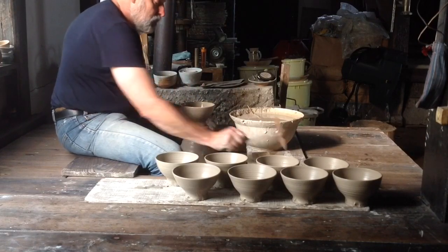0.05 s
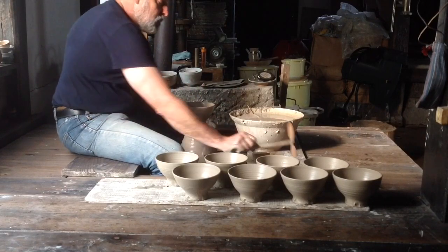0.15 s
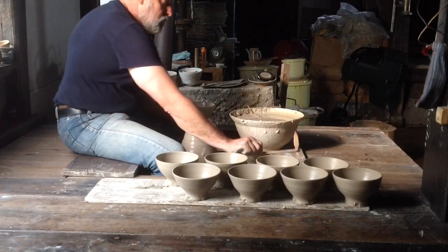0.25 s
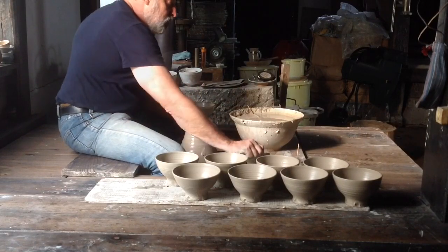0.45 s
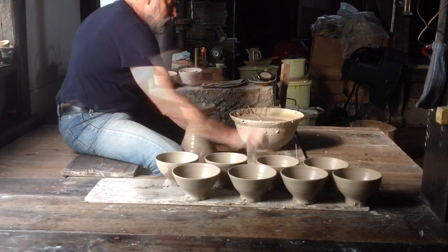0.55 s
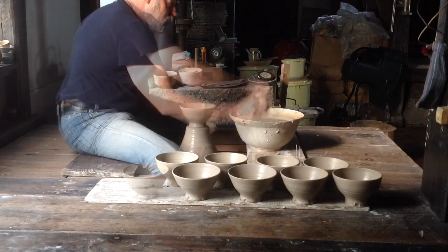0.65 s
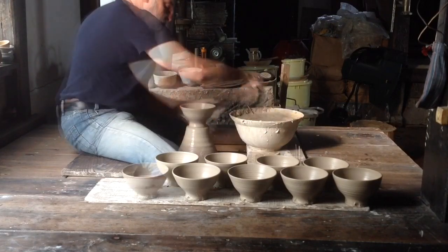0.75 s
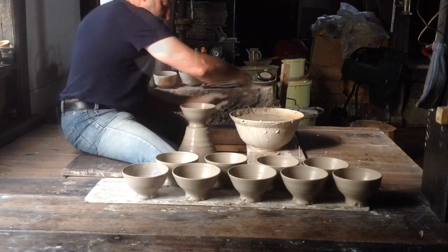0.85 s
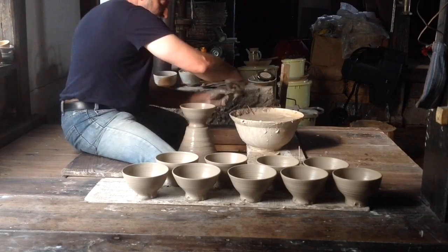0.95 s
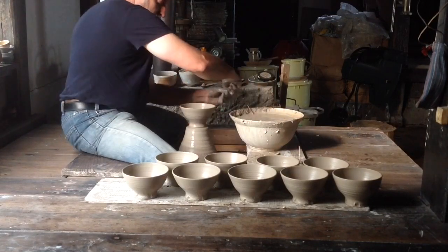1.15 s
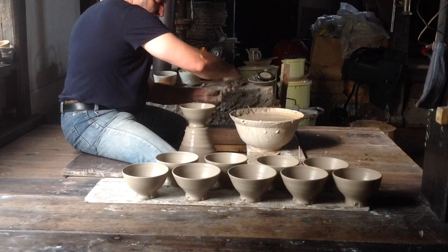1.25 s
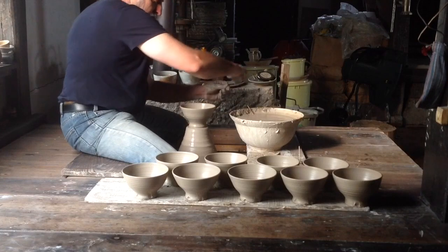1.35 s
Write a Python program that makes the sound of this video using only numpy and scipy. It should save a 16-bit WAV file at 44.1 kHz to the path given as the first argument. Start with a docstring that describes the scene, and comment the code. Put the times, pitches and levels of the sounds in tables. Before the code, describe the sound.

Dull knocks and a short clatter of a tool on floorboards, then soft potter's wheel bumps.

```python
"""Over faint hiss, a potter knocks a small hard tool down on a wooden floor: one dull knock that rocks
a little, a second, then a short clatter as it settles. Each impact excites the damped modes of boards
and tool, so the boards boom, the tool clicks and the workshop reverberates briefly. Then the potter's
wheel rumbles and bumps softly as it turns, with light friction noise from scrapes and a sleeve."""
import sys
import numpy as np
from scipy import signal
from scipy.fft import rfft, irfft
from scipy.io import wavfile
from scipy.ndimage import uniform_filter1d, minimum_filter1d

SR = 44100
rng = np.random.default_rng(int(sys.argv[2]) if len(sys.argv) > 2 else 0)


def waveform_to_disk(signal):
    """Save audio, clipped to [-1, 1], as 16-bit WAV at the path in sys.argv[1]."""
    frames = np.transpose(np.atleast_2d(signal))
    scaled = np.clip(frames, -1, 1) * 32767
    samples = np.round(scaled).astype(np.int16)
    wavfile.write(sys.argv[1], SR, samples)


N = 61739


def undb(db):
    """Amplitude ratio of a level in decibels."""
    return 10 ** (np.asarray(db) / 20)

def unit(x):
    """Normalisation to unit energy."""
    return x / np.sqrt(np.sum(x ** 2))

def along(points, hz):
    """Interpolation of (f/Hz, value) points on a log-frequency axis."""
    f, v = np.array(points, float).T
    return np.interp(np.log(hz + 1), np.log(f), v)

def freqs():
    """Bin frequencies of a 2N-point transform."""
    return np.arange(N + 1) * SR / (2 * N)

def shape(x, gain):
    """Filtering as multiplication of the spectrum."""
    return irfft(rfft(x, 2 * N) * gain)[:N]

def noise(spectrum):
    """Spectrally shaped Gaussian noise of unit rms."""
    return unit(shape(rng.standard_normal(2 * N), undb(along(spectrum, freqs())))) * np.sqrt(N)

def drift(rate_hz):
    """Slow random modulation: random steps, smoothed twice."""
    k = int(SR / rate_hz)
    steps = np.repeat(rng.standard_normal(N // k + 1), k)
    return 0.99 * uniform_filter1d(uniform_filter1d(steps, k), k)[:N]

def fade(t60):
    """Exponential decay, 60 dB in t60 seconds."""
    return np.exp(-np.log(1000) * np.arange(N) / SR / t60)

def delay(x, s):
    """A time shift of s seconds."""
    return np.concatenate([np.zeros(int(s * SR)), x])[:N]

def cut(x, side, hz, order):
    """Maximally flat low-pass or high-pass filter."""
    return signal.sosfilt(signal.butter(order, hz, side, fs=SR, output="sos"), x)

def causal(gain):
    """Minimum-phase response: it rings only after its cause."""
    cepstrum = irfft(np.log(gain + 1e-9))
    cepstrum[1:N] *= 2
    cepstrum[N + 1:] = 0
    return np.exp(rfft(cepstrum))

def ring(t, modes, rise_s):
    """Modal superposition: damped sinusoids with a smooth onset."""
    onset = 1 - np.exp(-(t / rise_s) ** 2)
    return sum(undb(db) * np.sin(2 * np.pi * hz * t) * fade(t60) for hz, db, t60 in modes) * onset

def burst(t, rise_s, t60):
    """Impact excitation: a short noise transient of unit energy."""
    return unit(rng.standard_normal(N) * fade(t60) * (1 - np.exp(-t / rise_s)))


# spectrum of the hiss (f/Hz, relative level/dB)
HISS_SPECTRUM = [(30, -6), (70, -34), (150, 4), (300, -1), (600, -0.5), (1100, -5), (2200, -6), (3500, -6),
                 (6000, -8), (15000, -8.5)]

def hiss(level_db=-63):
    """Stationary broadband noise forms the background."""
    return undb(level_db) * noise(HISS_SPECTRUM)

# brushes of a sleeve (t/s, width/s, f/Hz, level/dB)
SLEEVE_BRUSHES = [(.085, 0.045, 3740, -67), (1.0, 0.021, 4000, -69.5), (1.109, 0.014, 2700, -63)]

def sleeve(t):
    """Friction of cloth as the arm moves gives brief swells of band noise."""
    out = 0
    for s, width, hz, db in SLEEVE_BRUSHES:
        swell = np.exp(-((t - s) / width) ** 2 / 2)
        out = out + undb(db) * swell * noise([(hz / 2, -22), (hz, 0), (hz * 2, -22)])
    return out

# scrapes at the wheel (t/s, rise/s, T60/s, level/dB)
SCRAPE_STROKES = [(.72, 0.023, 0.71, -59.5), (0.824, 0.016, 0.64, -65), (1.15, 0.034, 0.4, -64.5),
                  (1.236, 0.022, 0.43, -51), (1.271, 0.02, 0.25, -58.5)]
# their spectrum (f/Hz, relative level/dB)
SCRAPE_SPECTRUM = [(150, -16), (450, 3.5), (900, 3), (1200, -7), (1600, 0), (2300, -11), (3500, -20.5),
                   (7000, -27), (14000, -26)]

def scrapes(t, rough_db=1.0):
    """Sliding friction gives grainy noise that decays exponentially in the room."""
    envelope = 0
    for s, rise, t60, db in SCRAPE_STROKES:
        attack = np.clip((t - s) / rise, 0, 1)
        decay = np.exp(-np.log(1000) * np.maximum(t - s - rise, 0) / t60)
        envelope = envelope + undb(db) * attack * decay
    return envelope * noise(SCRAPE_SPECTRUM) * undb(rough_db * drift(200))

# envelope of the wheel's rumble (t/s, level/dB)
RUMBLE_ENVELOPE = [(0, -86), (.55, -63), (.69, -67), (.73, -52), (.79, -58.5), (.85, -52.5), (.9, -58),
                   (1.1, -52.5), (1.16, -55.5), (1.24, -51.5), (1.4, -58)]
# its spectrum (f/Hz, relative level/dB)
RUMBLE_SPECTRUM = [(40, -28), (75, -18.5), (110, -2), (200, 2.5), (320, 0), (480, -7), (700, -14.5),
                   (1000, -19.5), (2000, -24), (5000, -39), (14000, -37)]
# resonances rubbed up by the wheel (t/s, duration/s, f/Hz, level/dB)
WHEEL_RESONANCES = [(0.695, .24, 389.5, -57), (0.908, .22, 178, -55.5), (1.034, .19, 218, -57.5),
                    (1.301, .16, 172.6, -57), (1.34, .12, 235, -58)]

def wheel(t, edge_s=0.02, wander=0.012, flutter_db=-0.5):
    """Structure-borne rumble crosses the floor while friction excites wavering resonances."""
    out = noise(RUMBLE_SPECTRUM) * undb(np.interp(t, *np.array(RUMBLE_ENVELOPE).T))
    for s, length, hz, db in WHEEL_RESONANCES:
        swell = np.clip(np.minimum(t - s, s + length - t) / edge_s, 0, 1)
        phase = 2 * np.pi * np.cumsum(hz * (1 + wander * drift(40.16))) / SR
        out = out + swell * undb(db + flutter_db * drift(46)) * np.sqrt(2) * np.sin(phase)
    return out

# bumps of the turning wheel (t/s, level/dB)
WHEEL_BUMPS = [(.716, -57.5), (0.831, -57), (0.934, -45), (1.004, -48), (1.082, -45), (1.203, -51),
               (1.318, -44), (1.374, -49.5)]
# low modes of the boards (f/Hz, relative level/dB, T60/s)
BOARD_LOW_MODES = [(169.4, -4, 0.24), (216.6, 4.5, 0.1), (313, 1.5, 0.042)]

def bumps(t):
    """Each soft bump sets the boards' low modes into damped free vibration."""
    boom = ring(t, BOARD_LOW_MODES, rise_s=0.0044)
    return sum(delay(undb(db) * boom, s) for s, db in WHEEL_BUMPS)

# reverberation time of the workshop (f/Hz, T60/s)
REVERB_TIMES = [(150, 0.32), (700, 0.52), (2000, 0.41), (7000, 0.32), (14000, 0.27)]

def workshop(t, build_s=0.007):
    """Impulse response of a diffuse field: it builds quickly, and the top treble dies first."""
    white, tail = rng.standard_normal(N), 0
    for band_hz, t60 in REVERB_TIMES:
        band = along([(hz, hz == band_hz) for hz, _ in REVERB_TIMES], freqs())
        tail = tail + shape(white, band) * fade(t60)
    return unit(tail * (1 - np.exp(-t / build_s)))

def reverberate(x, room, wet_db):
    """Direct sound plus its convolution with the room response."""
    return x + undb(wet_db) * signal.fftconvolve(x, room)[:N]

# modes of the boards (f/Hz, relative level/dB, T60/s)
FLOOR_MODES = [(150.5, -24, 0.46), (171.9, -11, .33), (225.25, -17, 0.95), (293, -41, 0.17),
               (338, -11, 0.29), (359, -24, 0.58), (479, -8, 0.23), (637, -7, .12), (697.3, -5.5, .33),
               (835.5, -9, 0.2), (919, -24, 0.23), (1073, -10.5, 0.29), (1315, -6, 0.14),
               (1838, -2.5, 0.14)]
# spectrum of the wood's dense thud (f/Hz, relative level/dB)
THUD_SPECTRUM = [(50, -34), (85, -23.5), (140, -1), (300, -1.5), (650, -1.5), (1100, -1), (1330, -9),
                 (1520, -7.5), (2050, -3.5), (3200, -3), (8000, -43)]
# hollow note right under the tool (f/Hz, relative level/dB, T60/s)
HOLLOW_MODES = [(659, 3, 0.036), (547.5, -12.5, 0.068), (827, -8.5, 0.036), (1070, -13.5, 0.07)]

def floorboards(t, room, corner_hz, boom_db, hollow_db, linger_db, boom_hz=374):
    """Struck boards thud and ring; the contact acts as a low-pass, duller when softer."""
    crunch = burst(t, rise_s=0.0033, t60=0.041) + undb(0.5 + linger_db) * room
    thud = undb(13) * shape(crunch, causal(undb(along(THUD_SPECTRUM, freqs()))))
    modes = undb(-25 + linger_db) * ring(t, FLOOR_MODES, rise_s=0.0011)
    bass_shelf = causal(undb(boom_db / (1 + (freqs() / boom_hz) ** 4)))
    wood = shape(thud + reverberate(modes, room, wet_db=-15.5), bass_shelf)
    hollow = undb(-21.5 + hollow_db) * ring(t, HOLLOW_MODES, rise_s=0.0022)
    return cut(wood, "low", corner_hz, order=4) + hollow

# resonances of the tool (f/Hz, bandwidth/Hz, relative level/dB)
TOOL_RESONANCES = [(2050, 88, -6.5), (2700, 560, -8), (3437, 190, -2), (3780, 250, -1.5), (4625, 99, -6.5),
                   (4880, 900, -3), (7330, 490, -1), (7640, 190, -5), (8410, 300, -3.5), (9760, 2000, -5.5),
                   (13200, 3100, -17)]
# its lowest modes, the clack (f/Hz, relative level/dB, T60/s)
CLACK_MODES = [(1336, 0.5, 0.083), (1217, -9, 0.082), (1146, -9, .08)]
# spectrum of the thin contact tick (f/Hz, relative level/dB)
TICK_SPECTRUM = [(800, -21), (2400, 16), (3100, -3.5), (6200, 6.5), (9500, -6), (13000, 6.5), (16000, -15)]

def tool(t, room, blow_db, click_db, rise_s=0.00054, skirt=1.15):
    """Impact excites the tool's resonances and a contact tick that grows with the blow."""
    f, power = freqs(), 0
    for hz, width, db in TOOL_RESONANCES:
        detuning = (f ** 2 - hz ** 2) / (width * (f + 1))
        power = power + undb(db) ** 2 * SR / (np.pi * width) / (1 + detuning ** 2) ** skirt
    click = undb(-23 + click_db) * causal(np.sqrt(power))
    tick = undb(-28.5 + blow_db) * causal(undb(along(TICK_SPECTRUM, f)))
    crack = burst(t, rise_s, t60=0.032) + undb(4) * room
    clack = undb(-33.5 + click_db) * ring(t, CLACK_MODES, rise_s)
    return shape(crack, click + tick) + reverberate(clack, room, wet_db=-8.5)

# impacts of the tool on the floor
# (t/s, level/dB, contact corner/Hz, bass boom/dB, hollow note/dB, tool click/dB, wood's lingering/dB)
IMPACTS = [(0.2222, -3, 1020, -2, 8.5, -44, 2), (0.2296, -7, 1160, 3.5, -16, -42, -0.5),
           (0.2930, -15.5, 1200, -2, -12, -27, -3), (0.3230, -17, 1260, -9, 2, -39, -8),
           (0.3700, -4.5, 1430, 11, 3, -11, -6), (0.3825, -9.5, 2220, 7.5, 10, -2.5, -5),
           (0.3880, -7, 2590, 5, -18, -3, -4.5), (0.4002, -9.5, 2180, -5, -28, -15.5, -5.5),
           (0.415, -11, 1770, -12, 0, -14, -5.5), (0.4495, -13, 1600, 4, -21, -0.5, -4),
           (0.4550, -13, 1720, 0, -22, 4.5, -4), (0.4726, -8.5, 1390, -1, -26, -6.5, -5.5),
           (0.4878, -6, 1060, 4, -0.5, -16, -4.5), (0.5050, -13, 1540, 8, -25, -10, -8.5),
           (0.5300, -10.5, 1350, 10, 2.5, -13.5, -5), (0.5500, -12.5, 1000, 14, -1, -33, -9),
           (0.5740, -16, 820, 0, 8, -27, -7)]

def knocks(t, board_cut_hz=122):
    """Action and reaction: each impact drives both boards and tool, and the room answers."""
    boards, clicks = 0, 0
    for s, db, corner_hz, boom_db, hollow_db, click_db, linger_db in IMPACTS:
        room = workshop(t)
        wood = floorboards(t, room, corner_hz, boom_db, hollow_db, linger_db)
        boards = boards + delay(undb(db) * wood, s)
        clicks = clicks + delay(tool(t, room, db, click_db), s)
    return cut(boards, "high", board_cut_hz, order=4) + clicks


def scene():
    """Linear superposition of all sources in one channel."""
    t = np.arange(N) / SR
    return (knocks(t) + wheel(t) + bumps(t) + scrapes(t) + sleeve(t) + hiss())[None]

def gain_control(x, threshold_db=-42.5, slope=0.19, hold_s=0.17, slew_s=0.074):
    """Compression: the gain falls a little after loud sounds, holds, then recovers."""
    step = 1 / (slew_s * SR)
    smooth = lambda v: signal.lfilter([step], [1, step - 1], v)
    excess_db = np.maximum(10 * np.log10(smooth(x ** 2) + 1e-12) - threshold_db, 0)
    half = int(hold_s * SR / 2)
    held_db = minimum_filter1d(-slope * excess_db, 2 * half + 1, origin=half, mode="constant")
    return x * undb(smooth(held_db))

def record(dry, low_cut_hz=70, top_hz=15200):
    """Band limiting and compression: deep bass is cut, peaks are eased, the top is cut."""
    compressed = gain_control(cut(dry, "high", low_cut_hz, order=2))
    return signal.sosfilt(signal.ellip(10, .2, 70, top_hz, fs=SR, output="sos"), compressed)


dry = scene()
out = record(dry)
waveform_to_disk(out)
```